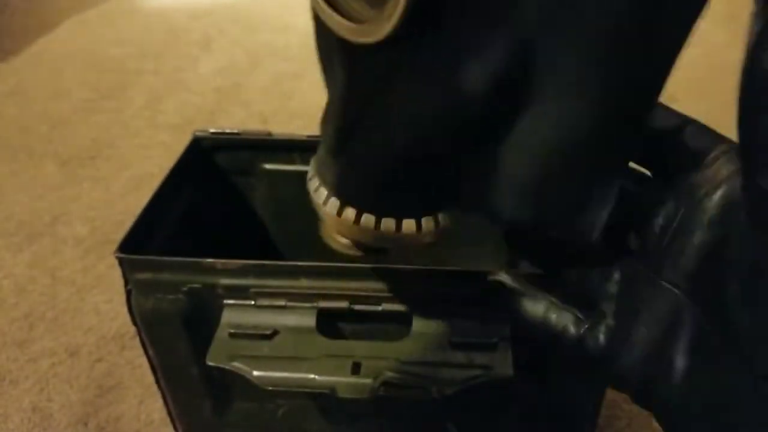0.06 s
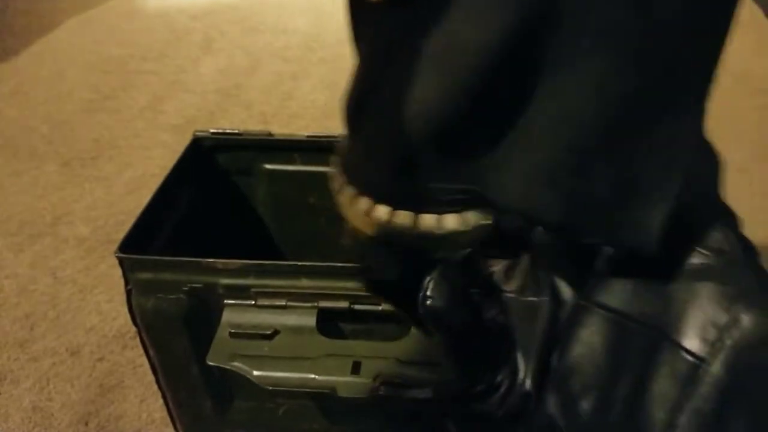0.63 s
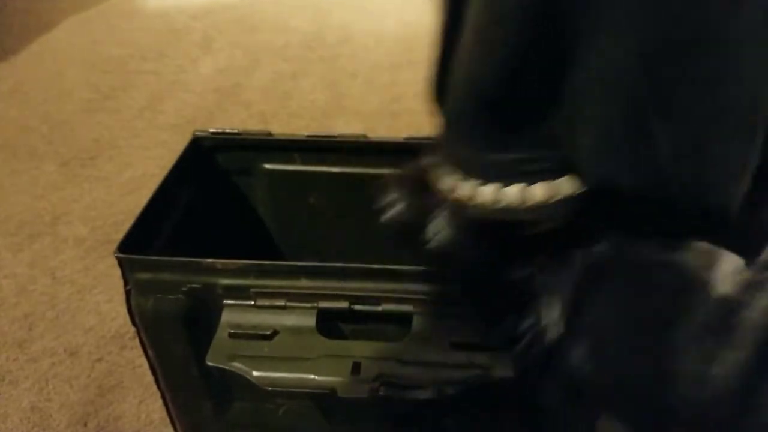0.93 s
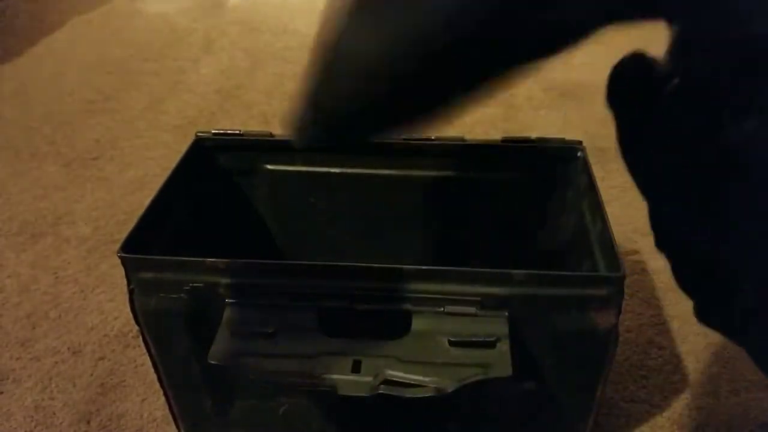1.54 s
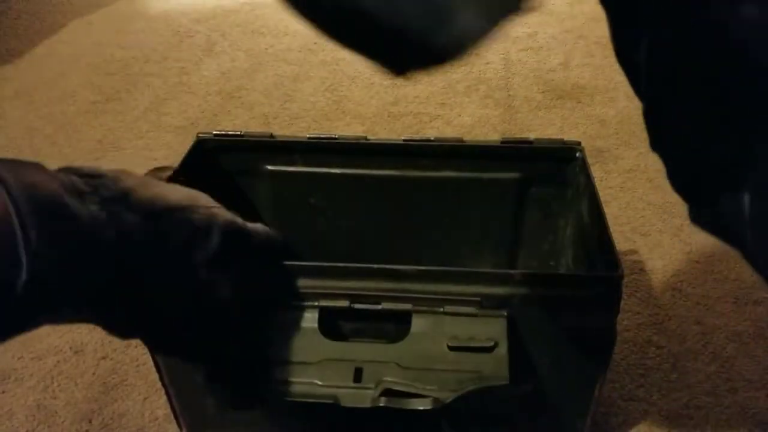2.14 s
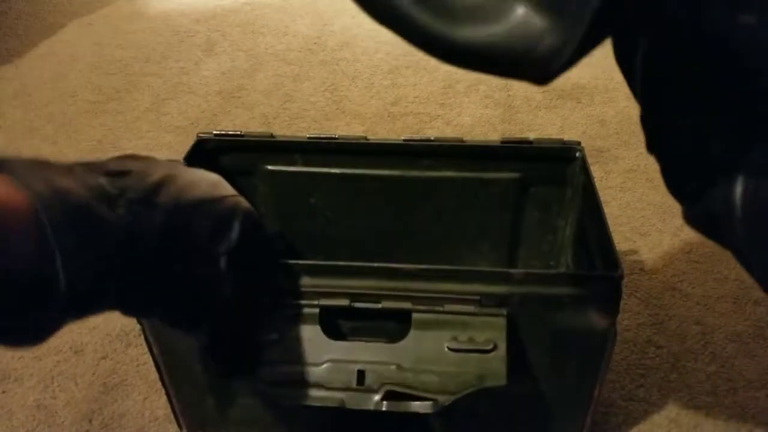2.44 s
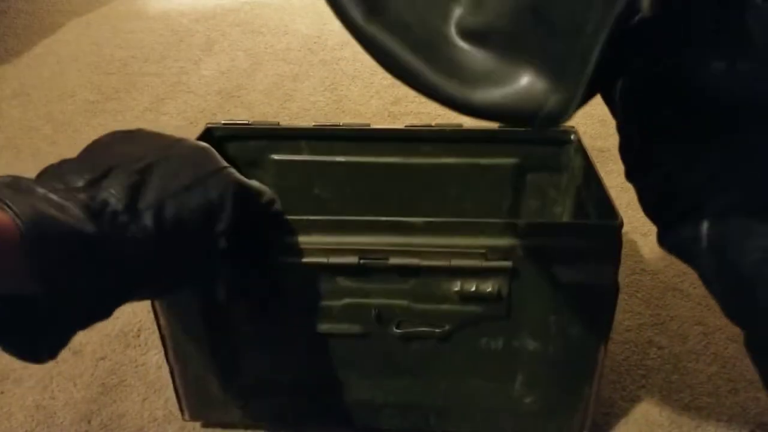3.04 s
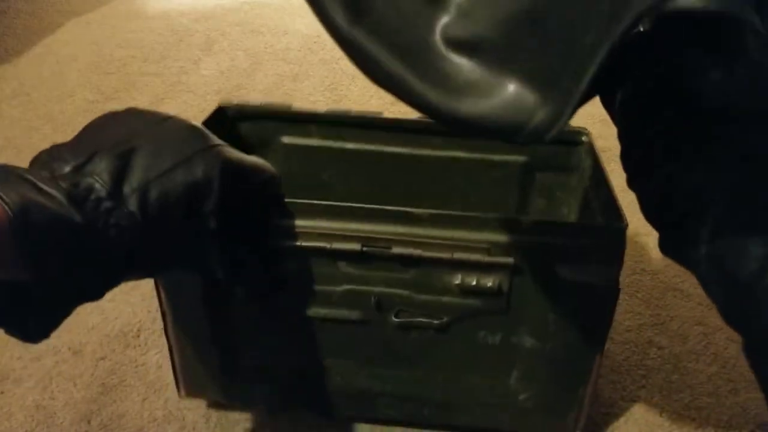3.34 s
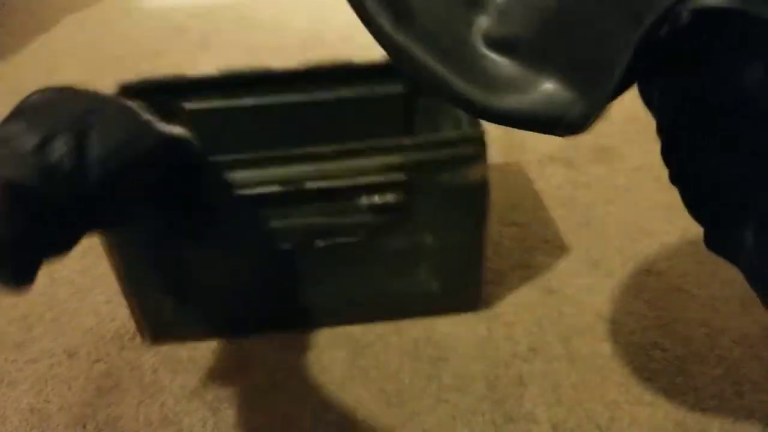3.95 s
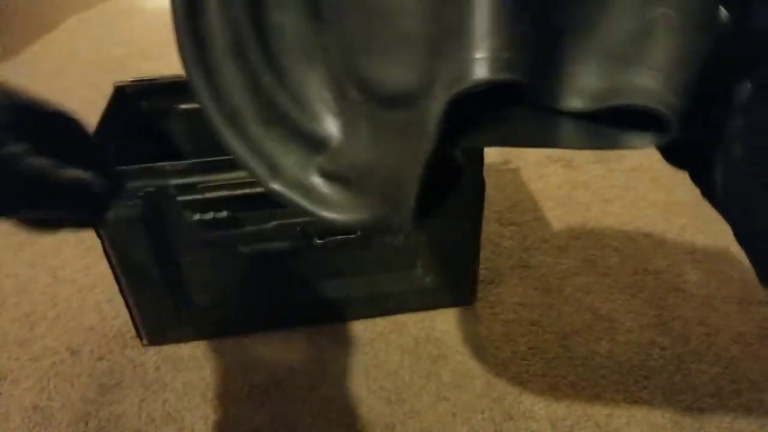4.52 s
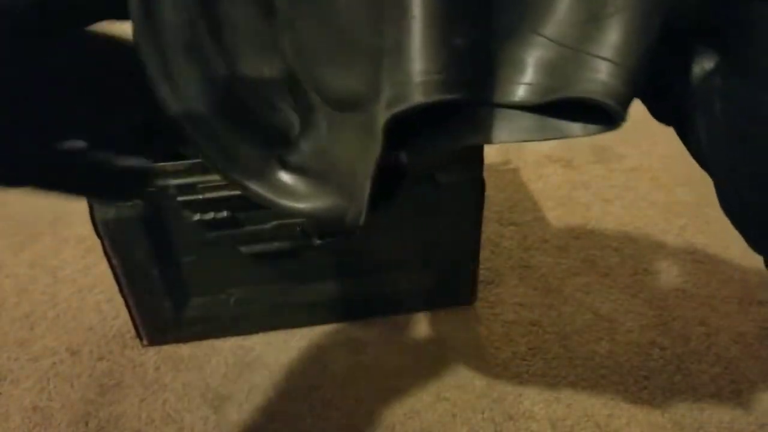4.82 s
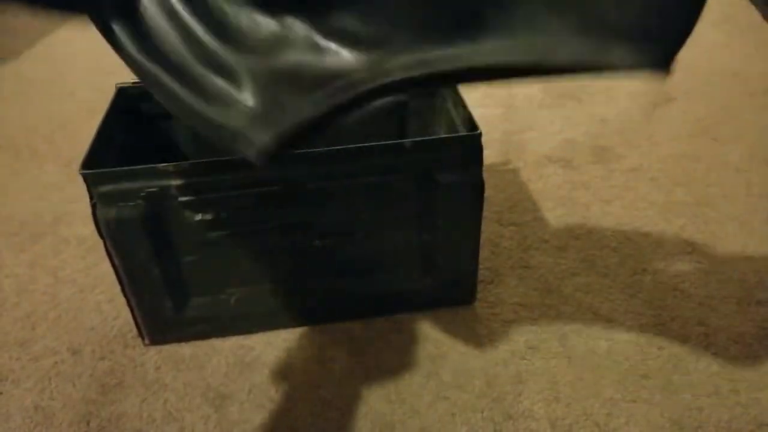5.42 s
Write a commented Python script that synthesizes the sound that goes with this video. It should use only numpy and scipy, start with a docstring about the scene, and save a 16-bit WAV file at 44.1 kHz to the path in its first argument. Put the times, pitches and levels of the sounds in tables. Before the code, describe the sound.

Quiet rubber handling and light clicks, followed by a rattling latch and the loud clatter of a metal box landing indoors.

```python
"""A small carpeted room, two microphones close to an open steel ammo can on the floor.
Gloved hands handle a rubber gas mask over the can: its fittings tick, its rubber flops and rubs.
A hand grips the can, tips it and lifts it. The loose latch swings against the can's wall, and the can
drops back with one loud clatter, its thin steel ringing and its floor plate booming.
Behind it all lie the low rumble of the house and a faint hum."""
import sys
import numpy as np
from scipy import signal
from scipy.fft import rfft, irfft, next_fast_len
from scipy.io import wavfile

SR = 44100
rng = np.random.default_rng(int(sys.argv[2]) if len(sys.argv) > 2 else 0)


def master(y):
    """Save y as 16-bit WAV."""
    cut = np.clip(np.atleast_2d(y).T, -1, 1)
    pcm = np.round(cut * 32767)  # scale
    wavfile.write(sys.argv[1], SR, pcm.astype(np.int16))


N = 246078
TIME_S, RING_S = np.arange(N) / SR, np.arange(16384) / SR  # time axes: the scene, one dying sound

# Blows on steel: start_s, level_db, contact_hz, crowd_db (share of close modes), left_db (over right)
CAN_HITS = [(3.6285, -30, 280, -3, -0.5), (3.659, -35.5, 260, -12, 2), (3.680, -36.5, 280, -3, -1),
            (3.864, -35, 280, -4.5, -0.5), (3.951, -26, 445, -4, -1.5), (3.964, -25.5, 348, -5, -1.5),
            (3.9848, -13, 17000, 5, 1), (3.9992, -16, 2200, -3, -2.5), (4.026, -20.5, 4020, 5, 0),
            (4.044, -28, 1700, 3, -1), (4.101, -44.5, 2500, 1.5, -1)]  # on the free can
LATCH_HITS = [(3.826, -45, 1500, 5, .5), (3.864, -40.5, 1500, 6.5, 1.06), (3.8738, -29.5, 11000, 6, 4),
              (3.8845, -14.5, 15000, 1, 1.08), (3.891, -28.5, 2500, -9.5, 1), (3.942, -24.5, 9000, 4, 5.1)]  # the swinging latch
WALL_HITS = [(2.537, -52, 2000, 8.5, -0.61), (2.6765, -29.5, 5000, 2, 1.47), (2.6865, -30, 650, 0, 1.66),
             (2.98, -53.5, 400, 12, -0.13)]  # on the can's front wall while the hand grips it
# Modes of the metal parts, in three rows: pitch_hz, relative_db, t60_s
CAN_MODES = [
    [169, 221, 253, 297, 373, 416, 460, 523, 657, 845, 894, 1093, 1233, 1394, 1680, 1762, 2040, 2126, 2385,
     2589, 2751, 3822, 4533],
    [-10, -4, -6, -10, 1.1, 2, -6, 1, -14, -12, -12, -8, -8, -0.5, -2.5, -1, 2.7, -1.5, -3.5, -14, -11.5,
     -8.5, -7],
    [0.2149, 0.2687, 0.375, 0.3456, 0.18, 0.2514, 0.2331, 0.24, 0.41, 0.163, 0.047, 0.1672, 0.3, 0.11,
     0.1922, 0.2238, 0.217, 0.1614, 0.2169, 0.3265, 0.182, 0.0913, 0.2457],
]
LATCH_MODES = [
    [170, 405, 461, 523, 690, 858, 1324, 1577, 2175, 2320, 2449, 3171, 3408, 3779, 5943, 6440, 8306],
    [-19, 0, 3.2, -7.5, -11, -3.5, -12, -3, -4, -4, -1, -5, -5, -9, -14, -10.5, -7],
    [0.57, 0.13, 0.086, 0.3542, 0.27, 0.2426, 0.23, 0.1848, 0.19, 0.0031, 0.1985, 0.1068, 0.1726, 0.2833,
     0.1744, 0.1648, 0.1339],
]
WALL_MODES = [
    [258, 404, 418, 748, 1012, 1217, 1400, 1523],
    [-14, 7, -14, -13, -17, -32, -13, -3.5],
    [0.66, 0.1884, 0.04, 0.3245, 0.3741, 0.65, 0.0029, 0.0283],
]
COLLAR_MODES = [
    [3467, 8156, 12580, 14780],
    [-18, -1, -20, 1],
    [.15, .18, .16, .11],
]
# The mask's metal valve collar rings: start_s, level_db, left_db
COLLAR_PINGS = [(1.1015, -49, -6.5)]
# Hard clicks of the mask's fittings and the can's rim: start_s, level_db, bright_hz, decay_s
CLICKS = [(.179, -50.5, 4200, .008), (.3215, -45, 3300, .0032), (.341, -46.5, 3300, .006),
          (1.1028, -39.5, 8000, .0017), (1.3059, -58, 14000, .0055), (1.3716, -51, 8000, .004),
          (1.5008, -55, 7000, .015), (1.5364, -53.5, 9000, .004), (2.534, -54.5, 6500, .0144),
          (3.679, -50, 9000, .004), (3.826, -45, 7500, .004), (5.3092, -31.5, 16000, .0021)]
# Short dull ticks of rubber, gloves and the swinging latch: start_s, level_db
DULL_TICKS = [(.8718, -53), (1.2042, -49), (1.2955, -46), (1.3701, -42.5), (1.540, -41.5), (1.577, -52),
              (1.603, -50), (2.018, -54), (2.535, -56), (3.628, -47), (3.6789, -38), (3.826, -45),
              (3.9422, -26), (4.42, -56), (5.3105, -42)]
# Damped swings: start_s, envelope_peak_db, pitch_hz
MASK_FLOPS = [(.231, -45.5, 576), (.335, -40, 465), (.774, -45, 514), (1.364, -35, 282),
              (1.373, -25.5, 480), (1.427, -34, 220), (1.456, -33, 480), (1.504, -39, 206),
              (1.530, -41, 380), (1.568, -42, 449), (1.603, -44, 480), (1.727, -44, 747),
              (1.798, -47.5, 850), (1.853, -42, 384), (2.018, -40, 493), (2.232, -43, 317),
              (5.176, -48, 752), (5.3107, -35, 800), (5.3445, -36.5, 480), (5.385, -47, 381),
              (5.457, -49, 750)]  # folds of the mask flop over
SOFT_BUMPS = [(.234, -45, 80), (.676, -38.5, 55), (1.372, -33, 98), (1.463, -38, 125), (3.285, -40.5, 85),
              (3.6825, -22, 150), (3.849, -38, 51), (3.946, -31, 54), (4.03, -38, 36), (4.15, -43, 32)]  # the hands, and the can's base on the carpet
PLATE_BOOMS = [(3.9995, -7.5, 390), (4.002, -14, 228)]  # the can's floor plate as it lands
# Effort of three movements, in relative levels: time_s, flex_db (rubber), rub_db (glove)
MASK_AWAY = [(0.0, -76, -75), (0.16, -69, -74), (0.32, -68, -71), (0.69, -70, -71), (0.98, -65, -63),
             (1.3, -64, -62), (1.45, -59, -62), (2.35, -73, -77), (2.45, -74, -77)]
CAN_GRIP = [(2.6, -73, -75), (2.714, -67, -69), (3.044, -70, -73), (3.474, -70, -72), (3.6, -67, -70)]
MASK_BACK = [(4.4, -72, -79), (4.712, -76, -81), (4.932, -76, -81), (5.112, -69, -74), (5.244, -67, -71),
             (5.58, -71, -76)]
# Rubber scuffs against glove or can: middle_s, flex_db, rub_db, half_length_s
SCUFFS = [(.01, -61, -68, .03), (1.44, -50, -66, .07), (1.55, -55, -62, .04), (2.03, -59, -62, .06),
          (2.985, -58, -70, .03), (3.53, -57, -67, .03), (3.745, -55, -65, .05), (4.43, -58, -67, .035),
          (4.98, -60, -73, .05), (5.22, -60, -66, .06)]
# The glove brushes along the can: middle_s, relative_db, half_length_s
GLOVE_SWIPES = [(2.076, -64.5, .03), (2.235, -66, .042), (2.586, -63, .045), (2.76, -67, .12)]
# A sleeve slides by with a thin hiss: time_s, relative_db
SLEEVE_SLIDE = [(1.58, -88.5), (1.68, -67.5), (1.78, -62), (1.88, -71), (1.97, -74.5), (2.05, -89.5)]
# The hands follow the mask to the right and back: time_s, left_db
HAND_PATH = [(0, -3), (1.1, -7.5), (1.5, -8.5), (2.5, 0), (4.4, 1), (5.3, -3)]
# Spectra of the sources: frequency_hz, relative_db (per Hz)
SHELL_SPECTRUM = [(100, -25), (280, 4.5), (450, -1), (800, -1), (1400, 0), (2200, 0), (3000, -4),
                  (5000, -7), (8000, -7), (12000, -9), (16000, -8.5)]  # the crowd of close modes in thin steel
CLICK_SPECTRUM = [(300, -3), (800, 2.5), (1500, 3), (2700, 6.5), (4500, 2.5), (7500, 2.5), (16000, 1.5)]
FLEX_SPECTRUM = [(120, -18.5), (280, -1.5), (520, 3), (800, -7.5), (1500, -21), (4000, -52)]
RUB_SPECTRUM = [(400, -15), (900, 0.5), (1400, 0.5), (1950, 2.5), (2800, -4), (3600, -12.5), (6000, -22.5),
                (12000, -34.5)]
SWISH_SPECTRUM = [(1500, -12.5), (4000, 1), (6000, 0.5), (8200, 3), (10000, -3), (13000, 1.5), (16000, -2)]
SLIDE_SPECTRUM = [(900, -34.5), (1600, -14), (1850, 2.5), (1980, -1.5), (2250, -18), (4000, -34.5)]
RUMBLE_SPECTRUM = [(12, -48.5), (20, -14), (70, -0.5), (91, 0), (131, -7), (185, -3.5), (206, -17),
                   (295, -9.5), (387, -20.5), (416, -12.5), (507, -25), (1160, -32.5), (1500, -47.5),
                   (1950, -76.5), (3300, -120)]
# Tones of the background hum: pitch_hz, relative_db
HUM_TONES = [(104, -59.5), (120, -61), (179, -64.5), (300, -64), (364, -70.5), (424, -72.5)]
# Ringing times of the thin steel and of the room: frequency_hz, t60_s
SHELL_T60 = [(200, 0.31), (2000, .26), (6000, 0.264), (15000, .19)]
ROOM_T60 = [(100, 0.38), (500, 0.36), (2000, 0.4), (7000, 0.26), (15000, 0.13)]
# How alike the sound is at the two microphones: frequency_hz, correlation
MIC_LIKENESS = [(50, 0.901), (200, 0.834), (400, .8), (700, 0.34), (1500, 0.14), (4000, 0.017),
                (16000, 0.014)]


def steel(hits, modes, shell_db, lowest_hz, crack_db, crack_s, rise_s, peaky_db):
    """A blow sets off main modes, a crowd of close modes and a short crack; soft contact dulls them."""
    out = np.zeros((2, N))
    hz = np.arange(100, 16000, 18)
    peaks_db = peaky_db * rng.uniform(-1, 1, len(hz))  # the same peaks at every blow
    shell = np.transpose([hz, read(SHELL_SPECTRUM, hz) + peaks_db])
    main = at_level(ring(modes) * (1 - np.exp(-RING_S / rise_s)), 0, samples=880)
    for start_s, db, contact_hz, crowd_db, left_db in hits:
        crowd = cut(dying_noise(shell, SHELL_T60), lowest_hz, "high")
        crowd = at_level(crowd, shell_db + crowd_db, samples=880)
        crack = amp(crack_db) * np.exp(-RING_S / crack_s)
        crowd *= (1 + crack) * (1 - np.exp(-RING_S / .0007))
        blow = cut(main + crowd, contact_hz, "low")
        add(out, start_s, at_level(blow, db, samples=880), left_db)
    return out


def thumps():
    """The can's floor plate booms on landing; the hands and the can's base bump softly."""
    return damped(PLATE_BOOMS, cycles=1.12, lean=0) + damped(SOFT_BUMPS, cycles=.62, lean=.55)


def fitting_clicks():
    """Hard fittings and the can's rim make contact: bright bursts a few milliseconds long."""
    out, t = np.zeros((2, N)), RING_S[:2048]
    for start_s, db, bright_hz, decay_s in CLICKS:
        click = colour(rng.standard_normal((2, len(t))), CLICK_SPECTRUM) * np.exp(-t / decay_s)
        click = cut(click, .26 * bright_hz, "high")
        click = cut(click, bright_hz, "low", order=1)
        add(out, start_s, at_level(click, db, samples=220), hand_left_db(start_s))
    return out


def dull_ticks(low_hz=600, high_hz=2200, decay_s=.0035):
    """Short dull ticks of rubber, gloves and the swinging latch; faint strays follow the rubbing level."""
    out, t = np.zeros((2, N)), RING_S[:2048]
    stray_s, scatter_db, _ = strays(count=40)
    _, rub_db = effort(stray_s)
    for start_s, db in [*DULL_TICKS, *zip(stray_s, rub_db + 2 + scatter_db)]:
        tick = colour(rng.standard_normal((2, len(t))), [(500, 6), (16000, -3.5)]) * np.exp(-t / decay_s)
        tick = cut(tick, low_hz, "high", order=3)
        tick = cut(tick, high_hz, "low", order=5)
        add(out, start_s, at_level(tick, db, samples=220), hand_left_db(start_s))
    return out


def collar_ping():
    """The metal valve collar rings in a few high modes."""
    out = np.zeros((2, N))
    for start_s, db, left_db in COLLAR_PINGS:
        add(out, start_s, at_level(ring(COLLAR_MODES), db, samples=880), left_db)
    return out


def rubber_flops(stray_low_hz=320, stray_high_hz=800):
    """Heavily damped folds of rubber flop over; faint stray flops are as loud as the flexing allows."""
    stray_s, scatter_db, share = strays(count=45)
    flex_db, _ = effort(stray_s)
    pitch_hz = stray_low_hz * (stray_high_hz / stray_low_hz) ** share
    faint = zip(stray_s, flex_db + 7 + scatter_db, pitch_hz)
    return damped([*MASK_FLOPS, *faint], cycles=.85, lean=.95)


def handling(lean=.3):
    """Rubber flexes, gloves rub on it and sleeves swish as the hands move."""
    flex_db, rub_db = effort(TIME_S)
    swish_db = -73.8 + .38 * (rub_db + 70)  # the sleeves follow the rubbing, but vary less
    for middle_s, db, half_s in GLOVE_SWIPES:
        swish_db = np.maximum(swish_db, stroke_db(TIME_S, middle_s, db, half_s))
    slide_db = np.interp(TIME_S, *np.transpose(SLEEVE_SLIDE), left=-120, right=-120)
    flex = friction(flex_db + 2, FLEX_SPECTRUM, slips_per_s=200, slip_share=.8, uneven_db=2.2)
    rub = friction(rub_db + .6, RUB_SPECTRUM, slips_per_s=300, slip_share=.8, uneven_db=1.7249)
    swish = friction(swish_db + 2, SWISH_SPECTRUM, slips_per_s=520, slip_share=.3, uneven_db=1.04)
    slide = friction(slide_db + .5, SLIDE_SPECTRUM, slips_per_s=600, slip_share=.3, uneven_db=1.5)
    balance = amp(lean * hand_left_db(TIME_S) * np.array([[.5], [-.5]]))
    return (flex + rub + swish + slide) * balance


def friction(level_db, spectrum, slips_per_s, slip_share, uneven_db):
    """A smooth slide with many small slips in it, under a pressure that wavers."""
    slips = rng.uniform(-1, 1, (2, N)) * (rng.random(N) < slips_per_s / SR)
    drive = rng.standard_normal((2, N)) + slip_share * unit(slips)
    return colour(drive, spectrum) * amp(level_db + uneven_db * wander(25))


def effort(s, rest_db_per_s=25):
    """Levels of flexing and rubbing at time s: slow movements that die away, with scuffs on top."""
    levels = [[stroke_db(s, middle_s, flex_db, half_s), stroke_db(s, middle_s, rub_db, half_s)]
              for middle_s, flex_db, rub_db, half_s in SCUFFS]
    for movement in (MASK_AWAY, CAN_GRIP, MASK_BACK):
        at_s, flex_db, rub_db = np.transpose(movement)
        rest_db = rest_db_per_s * abs(s - np.clip(s, at_s[0], at_s[-1]))
        levels.append([np.interp(s, at_s, flex_db) - rest_db, np.interp(s, at_s, rub_db) - rest_db])
    return np.max(levels, 0)


def room_tail(x, build_s=.0023):
    """The carpeted room answers with a short tail at both microphones."""
    tail = dying_noise([(100, -3.5), (1000, -.5), (5000, -4.5), (16000, 1)], ROOM_T60)
    tail *= 1 - np.exp(-(RING_S / build_s) ** 2)
    blended = .7 * x + .3 * x[::-1]
    return signal.fftconvolve(blended, tail / np.linalg.norm(tail[0]), axes=1)[:, :N]


def room_tone(waver_rad=.24):
    """Low rumble of the house, stronger while the body moves, with a faint wavering hum."""
    rumble = colour(rng.standard_normal((2, N)), RUMBLE_SPECTRUM) * amp(-52 + 1.5 * wander(5))
    rumble *= amp(np.interp(TIME_S, [0, 1.5, 3.5, 4.6, 5.58], [-2.5, 0, -.5, -6, -2.5]))
    hum = sum(amp(db) * np.sin(2 * np.pi * hz * TIME_S + waver_rad * wander(4)) for hz, db in HUM_TONES)
    return rumble + amp(-1) * hum


def ring(modes, apart_hz=2200):
    """Dying sines; the higher ones reach the two microphones out of step."""
    hz, db, t60_s = np.array(modes)[:, :, None]
    skew = rng.choice([-1, 1], hz.shape) * np.pi / 4 * np.minimum(hz / apart_hz, 1)
    polarity = np.pi * np.arange(len(hz))[:, None]  # neighbouring modes swing in opposite senses
    phase = 2 * np.pi * hz * RING_S + polarity
    fade = amp(db) * np.exp(-np.log(1000) * RING_S / t60_s)
    return np.array([(fade * np.sin(phase + side * skew)).sum(0) for side in (1, -1)])


def damped(events, cycles, lean):
    """Brief swings that swell for `cycles` periods, so low ones last longer; they lean to the hands."""
    out = np.zeros((2, N))
    for start_s, db, hz in events:
        age = RING_S * hz / cycles
        envelope = amp(db) * age * np.exp(1 - age)
        add(out, start_s, envelope * np.sin(2 * np.pi * hz * RING_S), lean * hand_left_db(start_s))
    return out


def dying_noise(spectrum, t60_table):
    """A stereo tail in which each band dies at its own speed."""
    noise = colour(rng.standard_normal((2, len(RING_S))), spectrum)
    hz, t, bands = signal.stft(noise, SR, nperseg=256)
    fade = np.exp(-np.log(1000) * t / read(t60_table, hz)[:, None])
    return signal.istft(bands * fade, SR, nperseg=256)[1][:, :len(RING_S)]


def colour(x, spectrum):
    """Colours two unrelated channels and makes their bass alike, as at two close microphones."""
    size = next_fast_len(x.shape[1])
    first, second = rfft(x, size)
    hz = np.fft.rfftfreq(size, 1 / SR)
    likeness = read(MIC_LIKENESS, hz)
    mid, side = first * np.sqrt(1 + likeness), second * np.sqrt(1 - likeness)
    shaped = np.array([mid + side, mid - side]) * amp(read(spectrum, hz))
    return unit(irfft(shaped, size)[:, :x.shape[1]])


def hand_left_db(s):
    """Left-right balance of the hands at time s, positive to the left."""
    return np.interp(s, *np.transpose(HAND_PATH))


def stroke_db(s, middle_s, db, half_s):
    """Level of a short stroke that rises and falls evenly."""
    return db - 6 * ((s - middle_s) / half_s) ** 2


def strays(count, spread_db=2.5):
    """One random moment in each equal time slot, with a scatter in dB and a share between 0 and 1."""
    offset, size, share = rng.random((count, 3)).T
    start_s = (np.arange(count) + offset) / count * N / SR
    return start_s, spread_db * (2 * size - 1), share


def wander(rate_hz):
    """Slow drift of rms 1: random values joined by lines."""
    position = np.arange(N) * rate_hz * 2 / SR
    return unit(np.interp(position, np.arange(1024), rng.standard_normal(1024)))


def add(mix, start_s, sound, left_db):
    """Adds a sound at its time, leaning left or right."""
    sound = sound * amp([[left_db / 2], [-left_db / 2]])
    part = mix[:, round(start_s * SR):][:, :sound.shape[1]]
    part += sound[:, :part.shape[1]]


def at_level(x, db, samples):
    """Sets the rms of the first samples."""
    return x * amp(db) / np.sqrt(np.mean(x[..., :samples] ** 2) + 1e-30)


def cut(x, hz, kind, order=2):
    """Low-pass or high-pass."""
    return signal.sosfilt(signal.butter(order, hz, kind, fs=SR, output="sos"), x)


def read(table, hz):
    """Reads a table on a log-frequency axis."""
    table_hz, value = np.transpose(table)
    return np.interp(np.log(hz + 1), np.log(table_hz + 1), value)


def amp(db):
    """Decibels to gain."""
    return 10 ** (np.asarray(db) / 20)


def unit(x):
    """Scales to rms 1."""
    return x / np.sqrt(np.mean(x ** 2) + 1e-30)


def scene():
    """The can, the mask and the hands close up, the room behind them."""
    can = steel(CAN_HITS, CAN_MODES, shell_db=0, lowest_hz=170,
                crack_db=-6, crack_s=.004, rise_s=.0018, peaky_db=5.5)
    latch = steel(LATCH_HITS, LATCH_MODES, shell_db=-.5, lowest_hz=500,
                  crack_db=2, crack_s=.0059, rise_s=.003, peaky_db=6)
    wall = steel(WALL_HITS, WALL_MODES, shell_db=-12, lowest_hz=280,
                 crack_db=6, crack_s=.0045, rise_s=.00393, peaky_db=4.5)
    metal = can + latch + wall
    ticks = fitting_clicks() + dull_ticks() + collar_ping()
    thuds = thumps() + rubber_flops()
    into_room = amp(-17) * metal + amp(-2.5) * ticks + amp(-8) * thuds
    return metal + ticks + thuds + handling() + room_tone() + room_tail(into_room)


def record(dry):
    """Peaks round off near full scale; the treble ends at 16.3 kHz."""
    rounded = dry / (1 + dry ** 6) ** (1 / 6)
    band_limit = signal.firwin(255, 16300, window=("kaiser", 8), fs=SR)
    return signal.oaconvolve(rounded, band_limit[None], "same")


dry = scene()
out = record(dry)
master(out)
```